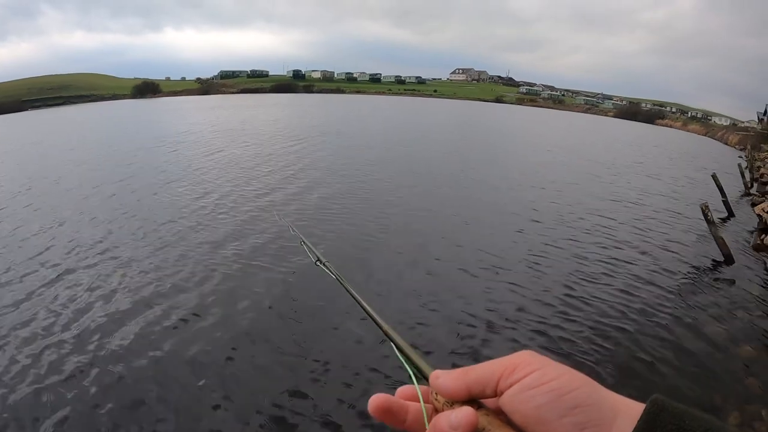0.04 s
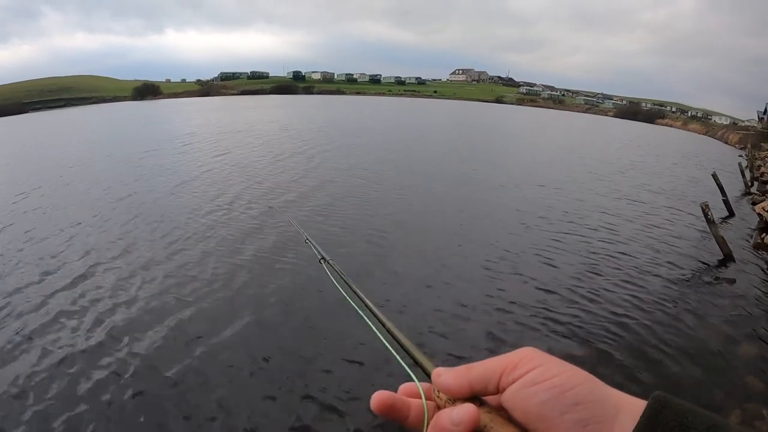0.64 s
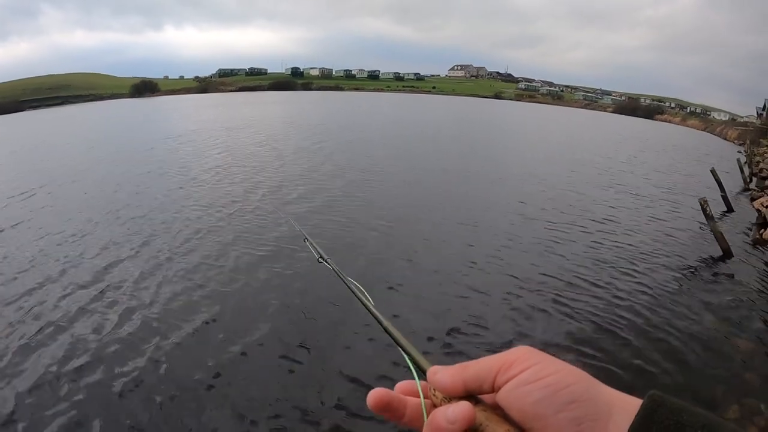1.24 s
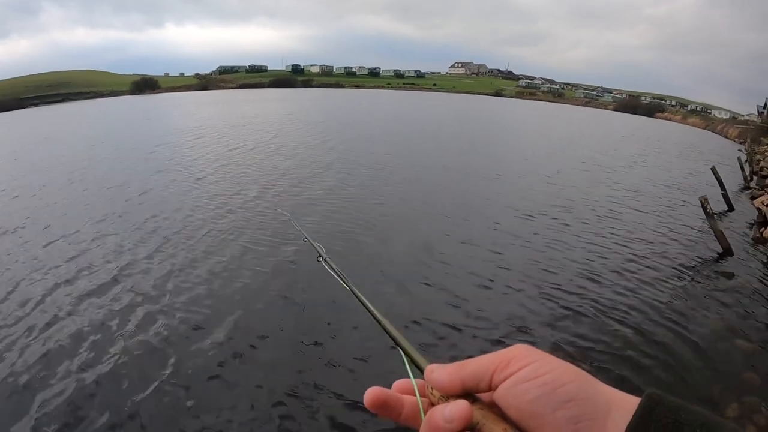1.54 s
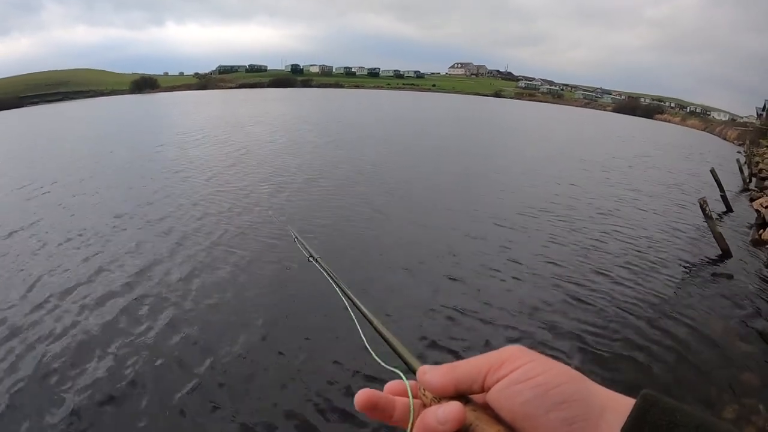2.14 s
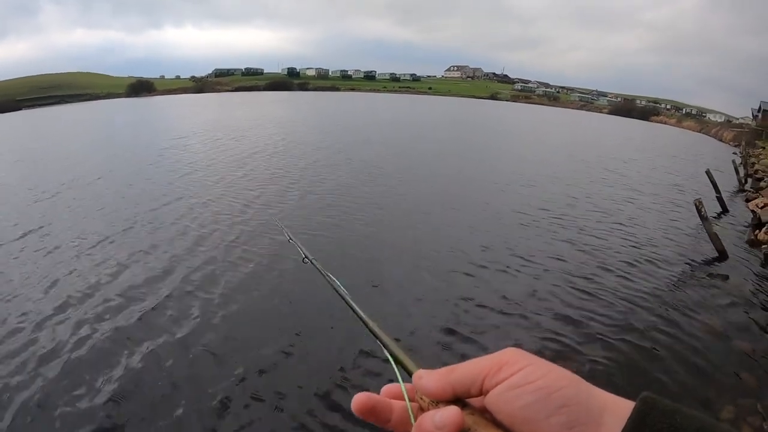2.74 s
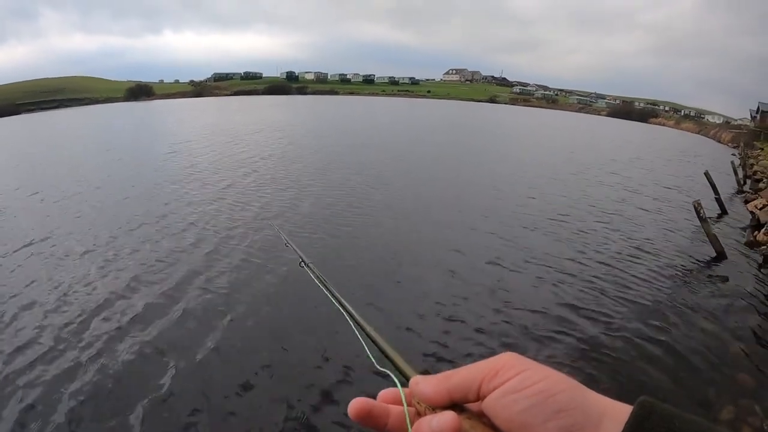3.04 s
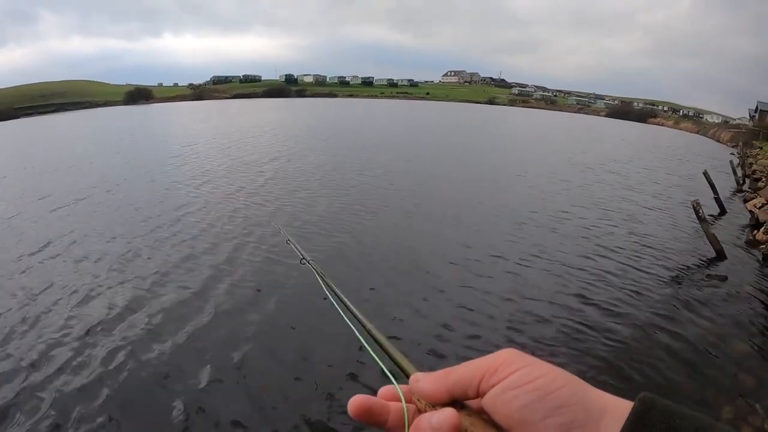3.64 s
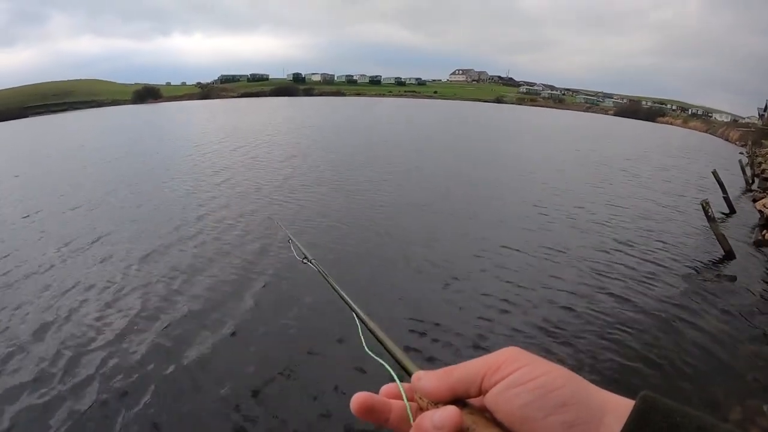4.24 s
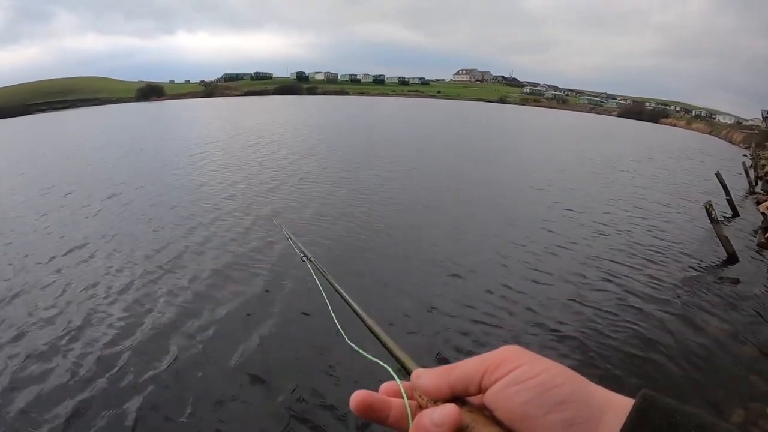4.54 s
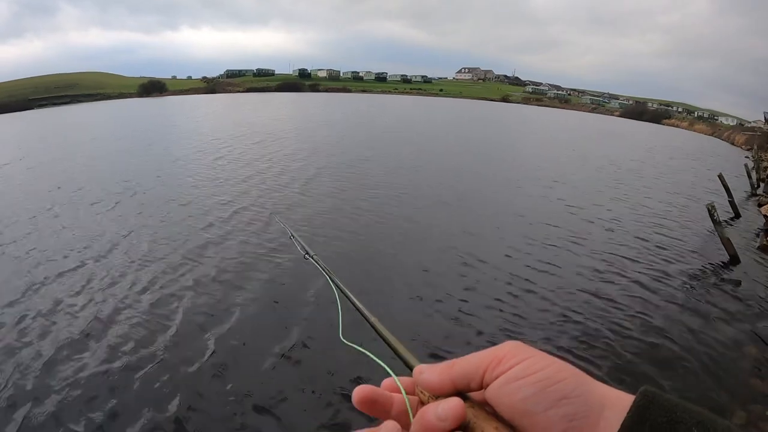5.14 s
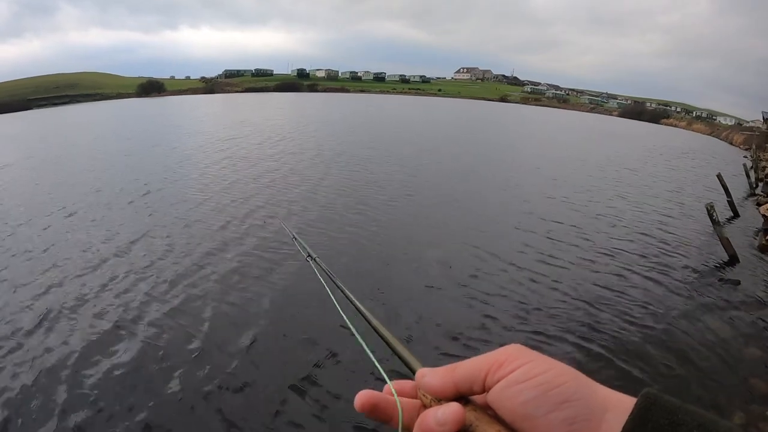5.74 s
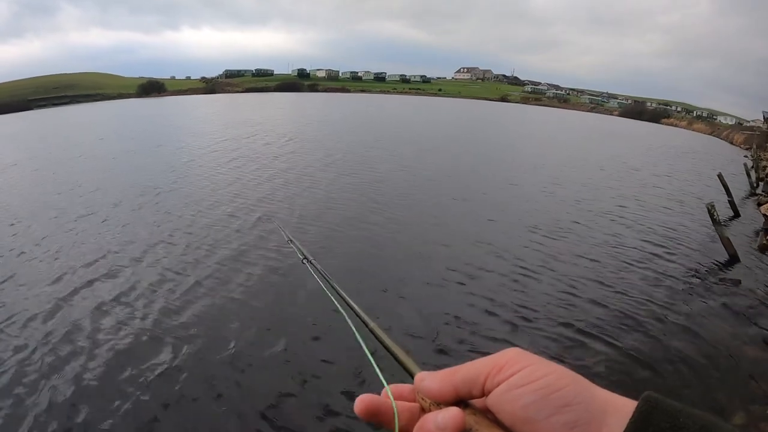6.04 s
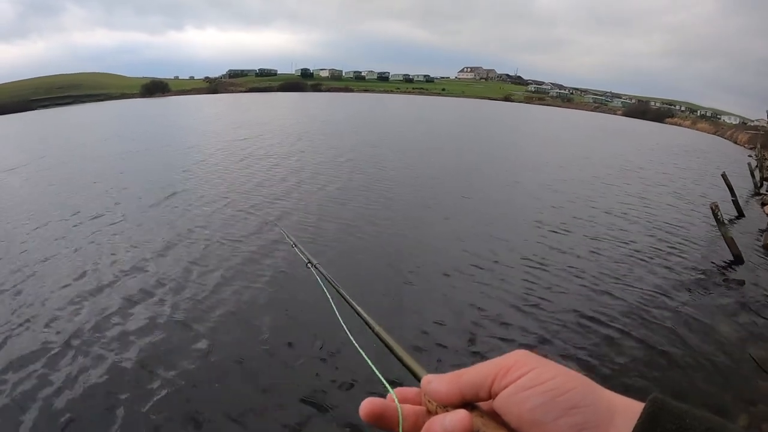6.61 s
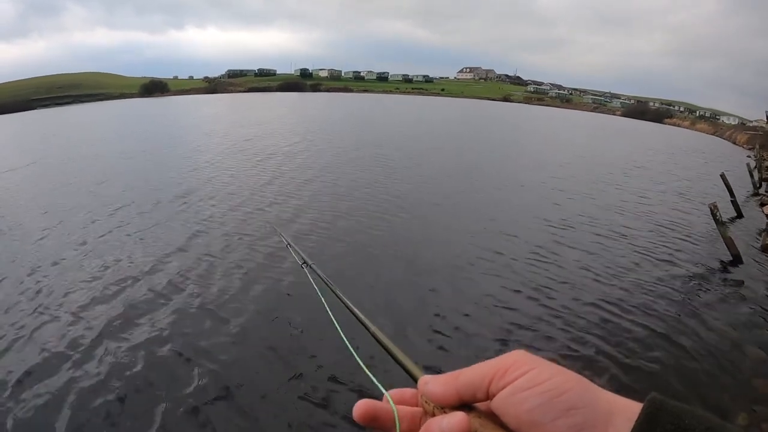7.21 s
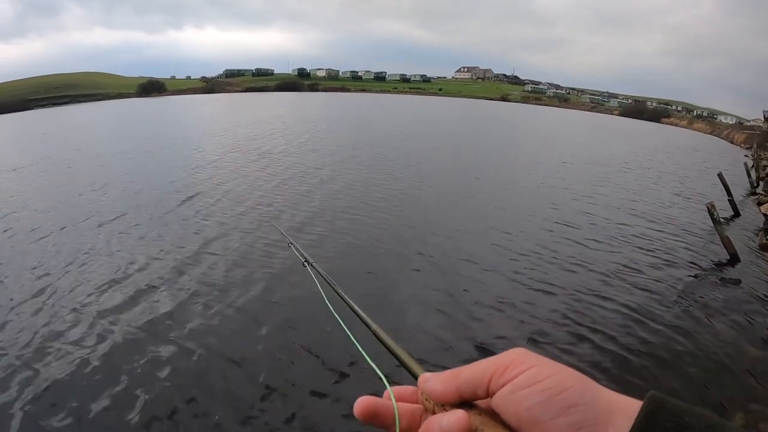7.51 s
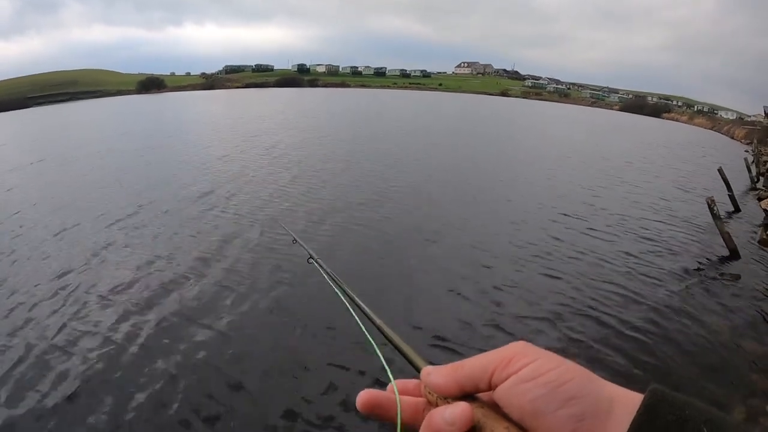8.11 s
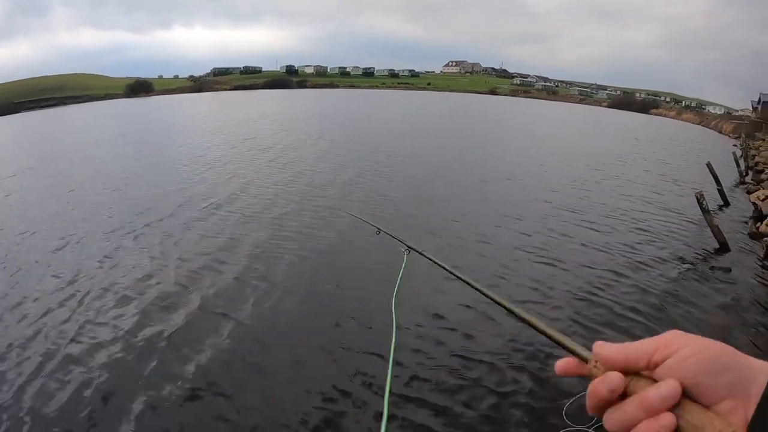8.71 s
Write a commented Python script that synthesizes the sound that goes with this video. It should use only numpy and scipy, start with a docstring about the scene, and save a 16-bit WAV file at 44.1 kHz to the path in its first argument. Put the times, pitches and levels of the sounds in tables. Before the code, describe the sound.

Short, close hisses repeat about three times a second as an angler strips fly line through a rod, with dry little slaps of slack line and a faint brush of jacket cloth. Behind it are soft wind and ripples on an open pond, and one brief, faint bird note from far off. The hiss turns tighter and more ringing later, and low wind buffets on the microphone build to a peak at the finish.

```python
"""Bank of a pond: fly line is stripped in quick pulls through the rod guides and over a finger.
Each pull hisses and rings the guides; slack line slaps the rod; a sleeve rustles as the hand reaches back.
Wind roars softly over open water and buffets the microphone, hardest at the end.
A far water bird calls once."""
import sys
import numpy as np
from scipy import signal
from scipy.fft import rfft, irfft, next_fast_len
from scipy.io import wavfile
from scipy.ndimage import uniform_filter1d

SR = 44100
rng = np.random.default_rng(int(sys.argv[2]) if len(sys.argv) > 2 else 0)


def pcm_store(signal):
    """Save signal as 16-bit PCM."""
    levels = np.round(np.clip(np.atleast_2d(signal), -1, 1) * 32767)
    wavfile.write(sys.argv[1], SR, levels.astype(np.int16).T)


N = 386580
TIME_S = np.arange(N) / SR

# wind over water: time_s, roar_db, rush_db
WIND_LEVELS = [(0.0, -52, -68), (1.09, -49, -65), (3.0, -47.5, -63.5), (4.09, -49.5, -62.5),
               (5.52, -50, -64.5), (6.15, -49, -63), (6.49, -50.5, -64.5), (7.41, -50.5, -64.5),
               (8.7, -47.5, -64)]
# hollow band in the roar: time_s, level_db
MOAN_LEVELS = [(0, -70), (2, -63), (3.5, -65), (4.8, -59.5), (6, -64.5), (7.5, -70), (8.7, -67)]
# far roar: freq_hz, density_db
ROAR_SPECTRUM = [(40, -18), (110, -7), (170, 2.5), (260, -1.5), (380, -5), (520, -10), (700, -16),
                 (1000, -24.5), (1600, -45.5)]
# hollow band: freq_hz, density_db
MOAN_SPECTRUM = [(560, -12.5), (700, 2.5), (820, 2.5), (920, -1.5), (1050, -17)]
# ripples: freq_hz, density_db
RUSH_SPECTRUM = [(600, 9), (1000, 2), (1350, 4), (1700, 2.5), (2100, -1), (2500, -9.5), (3300, -17),
                 (5000, -38), (9000, -34)]
# air eddying round the microphone: time_s, level_db
RUMBLE_LEVELS = [(0, -47), (.35, -55), (.65, -44), (1.3, -49.5), (2, -42), (2.25, -54.5), (2.6, -48),
                 (4.3, -51.5), (4.7, -40.5), (5.3, -52), (6, -53.5), (6.6, -42), (7.7, -43), (8.7, -35.5)]
# eddying air: freq_hz, density_db
RUMBLE_SPECTRUM = [(12, -15.5), (28, 2.5), (45, -2), (85, -6.5), (130, -13), (250, -26.5), (500, -50)]
# gusts on the microphone: middle_s, length_s, level_db
GUSTS = [(0.066, 0.049, -39), (0.611, 0.053, -42.5), (0.899, 0.051, -35), (1.846, .042, -34.5),
         (6.296, 0.05, -39.5), (6.677, 0.067, -42), (7.845, 0.076, -35.5), (7.993, 0.072, -33),
         (8.133, .05, -41), (8.263, .062, -24), (8.403, .05, -30.5), (8.438, .04, -36), (8.592, 0.046, -22),
         (8.688, 0.053, -29.5)]
# one swirl: centre_multiple, density_db
EDDY_SPECTRUM = [(.1, -10), (.3, -0.5), (.7, 1), (1.4, -3), (2.2, -8.5), (3.2, -23), (5, -37), (9, -75),
                 (16, -80)]
# bird note: time_s, pitch_hz, level_db
BIRD_NOTE = [(2.59, 620, -68), (2.615, 688, -52), (2.645, 710, -53.5), (2.675, 685, -53), (2.695, 650, -70)]
# its overtones: harmonic_number, level_db
BIRD_HARMONICS = [(2, 1), (3, -5), (4, -16)]
# jacket cloth: freq_hz, density_db
SLEEVE_SPECTRUM = [(1500, -23), (2600, 13), (3700, 9), (4800, 5.5), (6200, 4.5), (8100, 0), (9300, -12.5),
                   (12500, -50), (14500, -51)]
# line slapping the rod: time_s, level_db, centre_hz
SLAPS = [(1.218, -58, 4500), (1.62, -57, 5500), (1.955, -37, 2920), (2.238, -35, 4800),
         (2.565, -32.5, 2300), (2.848, -51, 5000), (3.044, -51, 4000), (3.247, -40, 3770),
         (4.068, -45, 3800), (4.414, -37, 5230), (5.261, -34, 4500), (6.06, -37, 3300), (6.083, -31, 2220),
         (6.121, -32, 3380), (6.353, -36.5, 3800), (6.674, -36.5, 2600), (6.937, -36, 3620),
         (6.943, -31.5, 2400), (6.954, -34.5, 3400), (7.239, -37, 2900), (7.283, -41, 3940),
         (7.999, -55, 6000), (8.064, -54, 10000), (8.105, -45, 4200), (8.138, -32.5, 3900),
         (8.174, -44, 3800), (8.485, -37.5, 3600)]
# one slap: freq_hz, density_db
SLAP_SPECTRUM = [(500, -18), (1200, 2.5), (2200, 6), (2900, -0.5), (3700, -2.5), (4700, -2.5), (6200, -2),
                 (8300, -5), (10000, -8.5), (14500, -28)]
# pulls of line: start_s, end_s, hiss_db, ring_above_hiss_db, sleeve_before_pull_db
LINE_PULLS = [(0.176, 0.333, -61.5, 2, -80), (0.581, 0.769, -61.5, 2.5, -81), (0.993, 1.146, -61, 1, -81),
              (1.372, 1.504, -59.5, 1.5, -81), (1.671, 1.791, -59, -0.5, -76.5),
              (1.948, 2.071, -59.5, 0.5, -75.5), (2.233, 2.364, -58.5, 1.5, -75),
              (2.542, 2.685, -58, 1, -68.5), (2.879, 3.036, -59, 3.5, -71.5),
              (3.234, 3.379, -59, 2.5, -74.5), (3.622, 3.785, -60, 3.5, -80.5),
              (4.005, 4.177, -59, 3.5, -80), (4.41, 4.576, -58, 2.5, -76.5), (4.818, 5.003, -60, 3, -75.5),
              (5.253, 5.381, -61, 3.5, -80), (5.386, 5.54, -61.5, 4.5, -74), (5.764, 5.914, -60, 5, -79),
              (6.059, 6.19, -58.5, 5.5, -70), (6.349, 6.479, -61.5, 5.5, -71),
              (6.634, 6.763, -62, 4.5, -74.5), (6.931, 7.06, -60, 4, -78), (7.236, 7.359, -59.5, 3, -81),
              (7.523, 7.642, -59.5, 3.5, -78.5), (7.805, 7.934, -59.5, 4.5, -77),
              (8.103, 8.238, -61.5, 9, -75.5), (8.426, 8.537, -66, 14.5, -77.5),
              (8.6, 8.834, -70, 8.5, -72.5)]
# course of a pull: duration_share, speed_share
PULL_SPEED = [(-.13, 0.09), (-.03, 0.35), (.03, 0.81), (.4, 0.96), (.72, 0.81), (.95, 0.46), (1.06, 0.12),
              (1.22, 0.02)]
# blend from loose to taut hiss: time_s, taut_share
TAUTNESS = [(0, 0.34), (5.8, 0.33), (6.4, 0.24), (6.9, 1), (8.7, 0.93)]
# loose line on the guides: freq_hz, density_db
LOOSE_SPECTRUM = [(1500, -19), (2400, 4.5), (3100, -3), (4200, -0.5), (4650, -3.5), (5200, 0), (6400, 2),
                  (7200, -4.5), (8100, -3), (9000, -24), (10500, -65)]
# taut line on the guides: freq_hz, density_db
TAUT_SPECTRUM = [(1500, -27), (2400, 5.5), (3100, 1.5), (4300, 4.5), (5200, 3), (6300, -2.5), (7300, -16),
                 (8600, -10.5), (9400, -13), (11000, -34)]
# slack line chattering: freq_hz, density_db
CHATTER_SPECTRUM = [(500, 3), (1000, -2.5), (1550, 4.5), (1850, 5.5), (2150, 4.5), (2700, -8.5),
                    (3300, -11.5), (5000, -22)]
# line at full speed: freq_hz, density_db
FIZZ_SPECTRUM = [(7500, 1), (9200, -8.5), (9950, 2), (10600, -4.5), (12500, 0.5), (13600, -6), (14600, -14)]
# guide resonances: freq_hz, width_hz, level_db
GUIDE_MODES = [(3234, 260, -9.5), (3643, 230, -6.5), (3878, 203, -6.5)]
# stereo width: time_s, side_gain_db
WIDTH = [(0, -18), (.4, -47), (1.4, -59), (6.1, -73), (6.6, -25.5), (7.5, -13.5), (8.3, -4), (8.7, -14.5)]
# microphone port hiss: freq_hz, density_db
PORT_SPECTRUM = [(6000, -9), (9000, -5), (11000, -3), (12300, 0), (13500, -4), (14500, -12)]


def amp(db):
    """Decibels to gain."""
    return 10 ** (np.asarray(db) / 20)


def unit(x):
    """Scale to rms 1."""
    return x / np.sqrt(np.mean(x ** 2) + 1e-20)


def curve(rows, column=1):
    """One column of a time table at every sample."""
    rows = np.asarray(rows)
    return np.interp(TIME_S, rows[:, 0], rows[:, column])


def colour(x, spectrum, skirt_db_per_octave=30):
    """Shape x by a log-frequency spectrum, rolled off past both ends; rms 1."""
    hz, db = np.transpose(spectrum)
    size = next_fast_len(len(x))
    octave = np.log2(np.fft.rfftfreq(size, 1 / SR) + 1)
    outside = np.maximum(np.log2(hz[0]) - octave, 0) + np.maximum(octave - np.log2(hz[-1]), 0)
    gain = amp(np.interp(octave, np.log2(hz), db) - skirt_db_per_octave * outside)
    return unit(irfft(rfft(x, size) * gain, size)[:len(x)])


def noise(size=N):
    """White noise."""
    return rng.standard_normal(size)


def wander(rate_hz):
    """Random drift, rms 1."""
    return unit(np.interp(TIME_S * rate_hz, np.arange(N), noise()))


def add(mix, start_s, sound):
    """Mix a sound in place."""
    part = mix[max(round(start_s * SR), 0):][:len(sound)]
    part += sound[:len(part)]


def dapple(x, depth_db, bins, frames):
    """Narrow bands flare and fade at random."""
    spectra = signal.stft(x, nperseg=512)[2]
    patches = uniform_filter1d(noise(spectra.shape), bins, axis=0)
    patches = unit(uniform_filter1d(patches, frames, axis=1))
    return unit(signal.istft(spectra * amp(depth_db * patches), nperseg=512)[1][:N])


def friction(slips_per_s, spread_db, grain_db):
    """Smooth rubbing plus tiny slips of uneven size."""
    slipping = rng.random(N) < slips_per_s / SR
    sizes = amp(spread_db * np.minimum(rng.exponential(1, N), 3))
    slips = slipping * sizes * np.sign(noise())
    return unit(noise() + amp(grain_db) * unit(slips))


def wind_over_water(roar_trim_db=1, rush_trim_db=3, swell_db=0.47):
    """Far roar with a hollow moan, and a lighter rush from the ripples."""
    roar = colour(noise(), ROAR_SPECTRUM) * amp(curve(WIND_LEVELS) + roar_trim_db)
    moan = colour(dapple(noise(), depth_db=2.5, bins=1, frames=14), MOAN_SPECTRUM)
    moan *= amp(curve(MOAN_LEVELS))
    rush = colour(dapple(noise(), depth_db=1.5, bins=2, frames=12), RUSH_SPECTRUM)
    rush *= amp(curve(WIND_LEVELS, column=2) + rush_trim_db)
    return (roar + moan + rush) * amp(swell_db * wander(13))


def eddy(middle_s, length_s, level_db, centre_hz):
    """One swirl of air swells and passes; returns start_s, sound."""
    size = 2 * round(length_s * SR)
    swirl = colour(noise(SR // 2), [(centre_hz * k, db) for k, db in EDDY_SPECTRUM])[:size]
    return middle_s - length_s, amp(level_db) * unit(swirl * np.hanning(size) ** 2) / np.sqrt(2)


def wind_on_microphone(rumble_trim_db=-0.5, lumps_db=2, usual_s=0.05, usual_db=-33.5, usual_hz=120.4):
    """Lumpy rumble and thudding gusts; short, hard gusts sound higher."""
    out = colour(noise(), RUMBLE_SPECTRUM)
    out *= amp(curve(RUMBLE_LEVELS) + rumble_trim_db + lumps_db * wander(9))
    for middle_s, length_s, db in GUSTS:
        hz = usual_hz * (usual_s / length_s) ** 0.59 * 2 ** (0.0421 * (db - usual_db))
        add(out, *eddy(middle_s, length_s, db, hz))
        add(out, *eddy(middle_s + 0.015, length_s * 1.6, db - 5, hz * 0.51))  # slower, deeper wake
    return out


def bird(trim_db=-1, waver_share=0.0054):
    """One short arched note from across the water."""
    calling = (TIME_S > BIRD_NOTE[0][0]) & (TIME_S < BIRD_NOTE[-1][0])
    pitch_hz = curve(BIRD_NOTE) * (1 + waver_share * wander(200))
    phase = 2 * np.pi * np.cumsum(pitch_hz) / SR
    note = sum(amp(db) * np.sin(k * phase) for k, db in BIRD_HARMONICS)
    return unit(note) * calling * amp(curve(BIRD_NOTE, column=2) + trim_db)


def sleeve(trim_db=0.5, slowing_db=-1, ease_s=0.027, regrip_db=-2):
    """Cloth brushes and creases as the arm reaches back between pulls, pausing for a new grip."""
    cloth = colour(friction(slips_per_s=250, spread_db=3.5, grain_db=-7), SLEEVE_SPECTRUM)
    creases_db = 1.1 * wander(50)
    reaching, release_s = np.zeros(N), 0
    for grip_s, end_s, _, _, db in LINE_PULLS:
        t = np.arange(max(release_s - ease_s, 0), grip_s + ease_s, 1 / SR)
        progress = np.linspace(0, 1, len(t))
        ease = np.minimum(np.minimum(t - t[0], t[-1] - t) / ease_s, 1)
        pause_db = regrip_db * np.exp(-((progress - 0.75) / 0.13) ** 2)
        add(reaching, t[0], ease * amp(db + slowing_db * (progress - 0.5) + pause_db))
        release_s = end_s
    return cloth * reaching * amp(trim_db + creases_db)


def light_slaps(rate_per_s=3, level_db=-68, spread_db=5, centre_hz=5000, count=60):
    """Faint chance touches of slack line on the rod; rows as in SLAPS."""
    times_s = np.cumsum(rng.exponential(1, count)) / rate_per_s
    scatter = rng.random((count, 2)) - 0.5
    return [(time_s, level_db + spread_db * size, centre_hz * 2 ** octaves)
            for time_s, (size, octaves) in zip(times_s, scatter) if time_s < TIME_S[-1]]


def line_slaps(trim_db=-4, decay_s=0.0014):
    """Line hits the rod: dry ticks, each strongest round its own pitch."""
    out = np.zeros(N)
    t = np.arange(1536) / SR - 0.003
    decay = (t > 0) * np.exp(-abs(t) / decay_s)
    for time_s, level_db, centre_hz in list(SLAPS) + light_slaps():
        spectrum = [(hz, db - 7 * np.log2(hz / centre_hz) ** 2) for hz, db in SLAP_SPECTRUM]
        tick = colour(noise(len(t)) * decay, spectrum)
        add(out, time_s + t[0], amp(level_db + trim_db) * tick * np.sqrt(np.mean(decay ** 2)))
    return out


def guide_ring(scrape):
    """Scraping drives the modes of the guides, summed in alternating polarity."""
    out = np.zeros(N)
    for k, (hz, width_hz, db) in enumerate(GUIDE_MODES):
        out += (-1) ** k * amp(db) * signal.lfilter(*signal.iirpeak(hz, hz / width_hz, SR), scrape)
    return unit(out)


def pull_envelopes(ring_rise_db=4, chatter_fall_db=7, fizz_db_per_s=1.0, chatter_db_per_s=0.84):
    """Hiss, ring, chatter and fizz gains; the last two grow as the line comes in."""
    envelopes = np.zeros((4, N))
    for start_s, end_s, hiss_db, ring_db, _ in LINE_PULLS:
        t = np.arange(start_s - 0.05, end_s + 0.08, 1 / SR)
        progress = (t - start_s) / (end_s - start_s)
        pulling = (progress > 0) & (progress < 1)
        speed = np.maximum(np.interp(progress, *np.transpose(PULL_SPEED), left=0, right=0), 0)
        hiss = speed ** 1.08
        ring = hiss * amp(ring_rise_db * np.minimum(progress, 1) ** 2)  # rises as the line tightens
        chatter = speed ** 1.34 * amp(-chatter_fall_db * progress)  # early, while slack
        fizz = speed ** 4  # needs full speed
        quickness_db = 8.5 * np.log2(0.13 / (end_s - start_s))
        chatter_db = -2.5 + chatter_db_per_s * start_s + quickness_db
        fizz_db = -18 + fizz_db_per_s * start_s
        layers = [(hiss, 0), (ring, ring_db), (chatter, chatter_db), (fizz, fizz_db)]
        for envelope, (shape, above_hiss_db) in zip(envelopes, layers):
            rms = np.sqrt(np.mean(shape[pulling] ** 2))
            add(envelope, t[0], amp(hiss_db + above_hiss_db) * shape / rms)
    return envelopes


def fly_line(hiss_trim_db=2.5, ring_trim_db=-1, chatter_trim_db=-3.5, flutter_db=0.7, rattle_db=2.5):
    """Coated line rubs through the guides; contact shifts and pressure flutters as it whips about."""
    hiss, ring, chatter, fizz = pull_envelopes()
    rub = dapple(friction(slips_per_s=1500, spread_db=4, grain_db=-1), depth_db=2.5, bins=3, frames=4)
    scrape = dapple(friction(slips_per_s=600, spread_db=3, grain_db=2), depth_db=1.8, bins=2, frames=3)
    grit = friction(slips_per_s=450, spread_db=3, grain_db=0)
    taut = curve(TAUTNESS)
    sliding = (1 - taut) * colour(rub, LOOSE_SPECTRUM) + taut * colour(rub, TAUT_SPECTRUM)
    sound = amp(hiss_trim_db) * hiss * sliding
    sound += amp(ring_trim_db) * ring * guide_ring(scrape)
    sound += amp(chatter_trim_db + rattle_db * wander(150)) * chatter * colour(grit, CHATTER_SPECTRUM)
    sound += fizz * colour(rub, FIZZ_SPECTRUM)
    return sound * amp(flutter_db * wander(120))


def chest_reflection(x, delay_s=1 / 710, echo_db=-15):
    """The angler's chest reflects close sounds, rippling their spectrum."""
    out = x.copy()
    add(out, delay_s, amp(echo_db) * x)
    return out


def scene(close_side_db=-7, side_lag_samples=40):
    """Rod and arm close, straight ahead; nearly mono, opening into stereo during the late gusts."""
    close = chest_reflection(fly_line() + line_slaps() + sleeve())
    middle = close + bird() + wind_over_water() + wind_on_microphone()
    close_side = amp(close_side_db) * np.roll(close, side_lag_samples)
    side = amp(curve(WIDTH)) * (close_side + wind_over_water() + wind_on_microphone())
    return np.array([middle + side, middle - side])


def port_lag(x, above_hz=11600, ramp_hz=400, lag_rad=1.4):
    """Top treble reaches the left microphone port just after the right."""
    hz = np.fft.rfftfreq(N, 1 / SR)
    phase_rad = lag_rad * np.clip((hz - above_hz) / ramp_hz, 0, 1) * np.array([[-0.5], [0.5]])
    return irfft(rfft(x) * np.exp(1j * phase_rad), N)


def record(dry, hiss_db=-87, cutoff_hz=14700):
    """Port lag, faint high hiss per port, then the band limit."""
    hiss = amp(hiss_db) * np.array([colour(noise(), PORT_SPECTRUM) for _ in dry])
    low_pass = signal.firwin(511, cutoff_hz, window=("kaiser", 9), fs=SR)
    return signal.oaconvolve(port_lag(dry) + hiss, low_pass[None], "same")


dry = scene()
out = record(dry)
pcm_store(out)
```